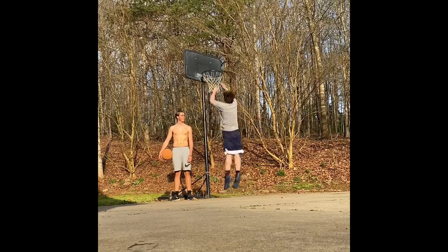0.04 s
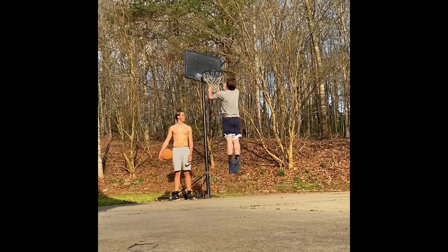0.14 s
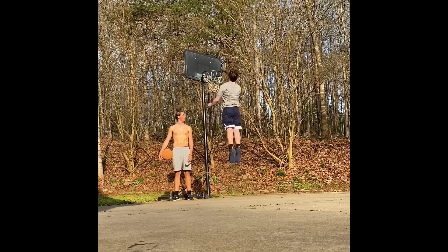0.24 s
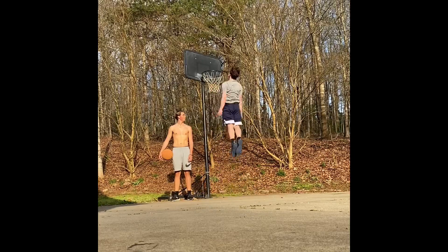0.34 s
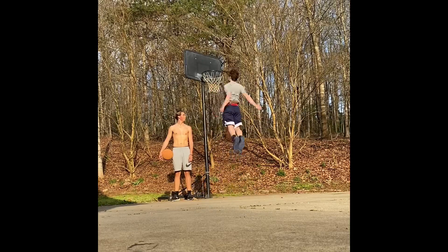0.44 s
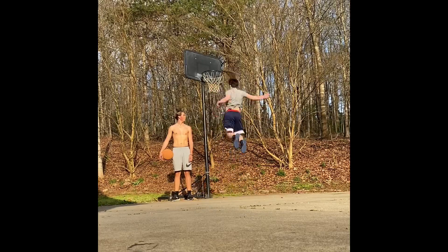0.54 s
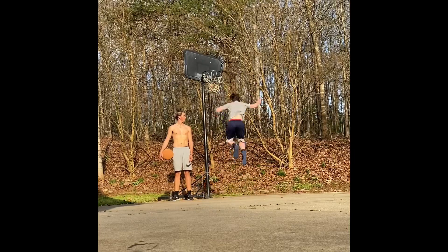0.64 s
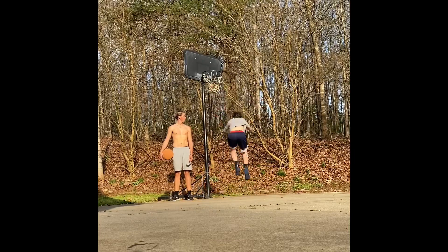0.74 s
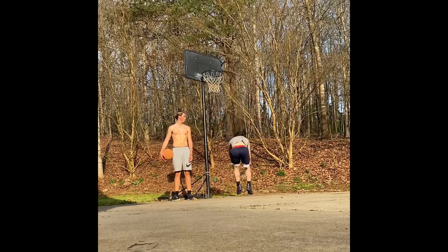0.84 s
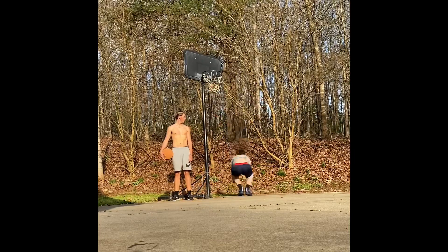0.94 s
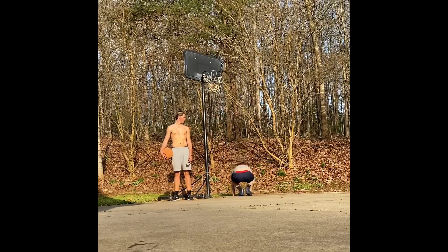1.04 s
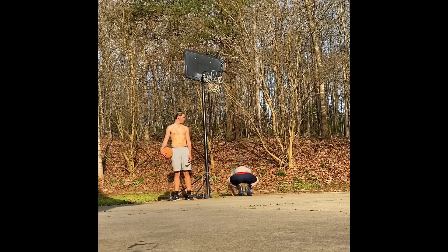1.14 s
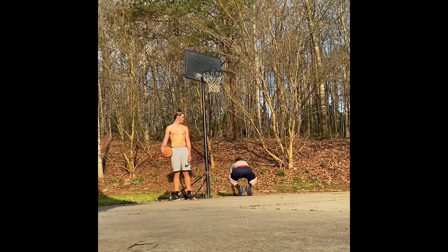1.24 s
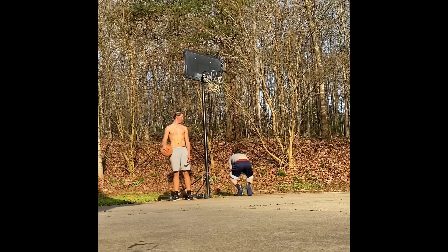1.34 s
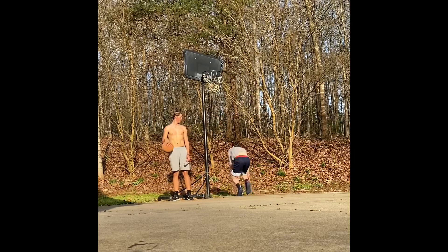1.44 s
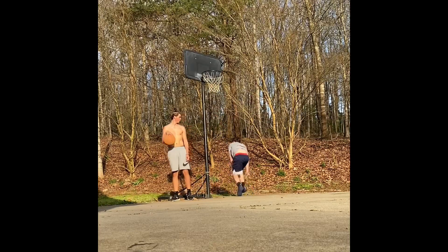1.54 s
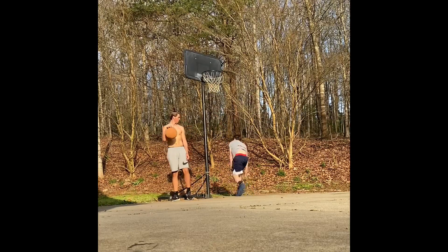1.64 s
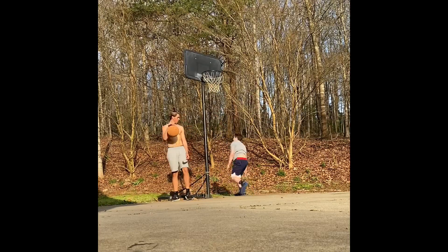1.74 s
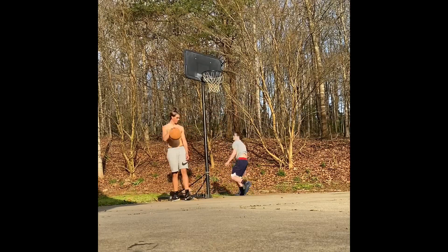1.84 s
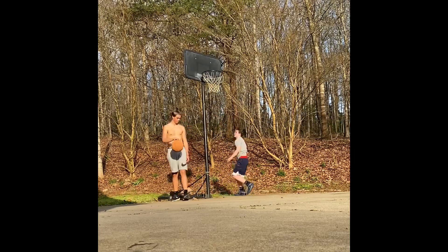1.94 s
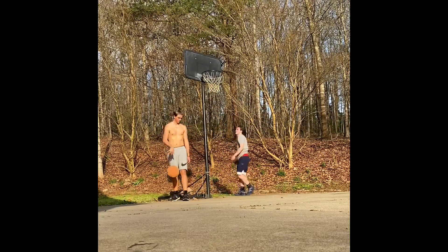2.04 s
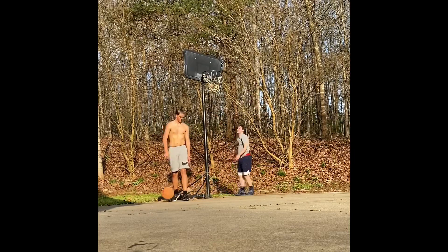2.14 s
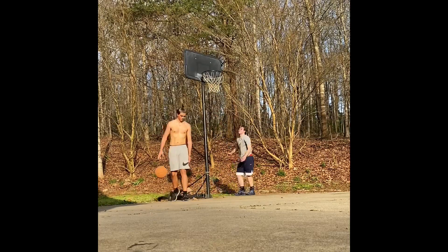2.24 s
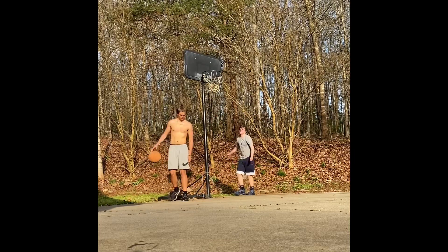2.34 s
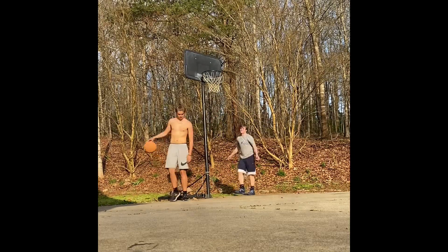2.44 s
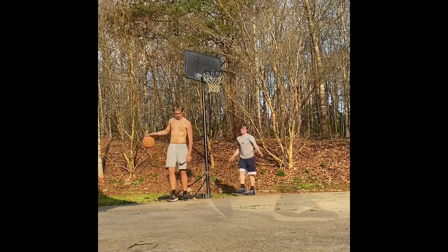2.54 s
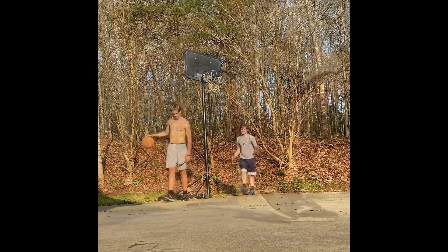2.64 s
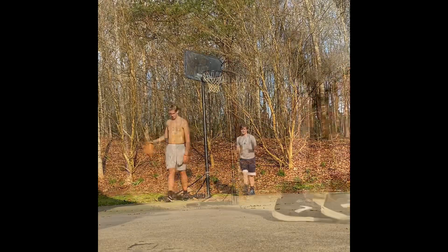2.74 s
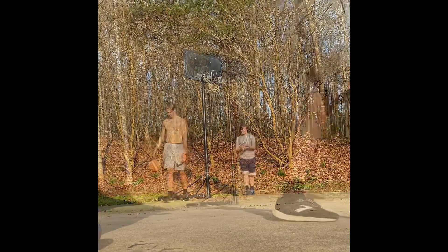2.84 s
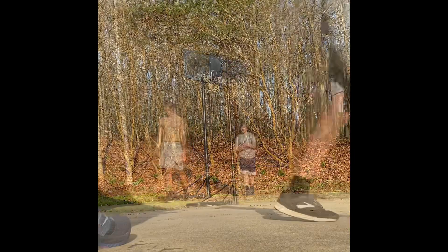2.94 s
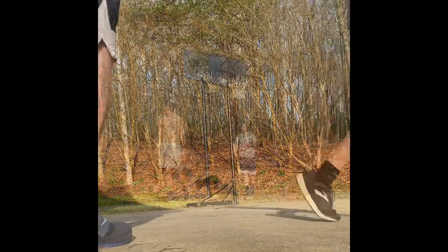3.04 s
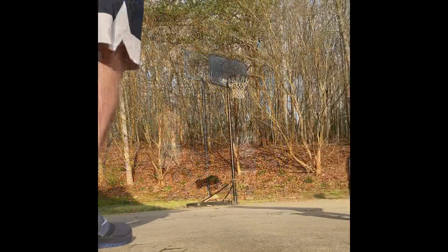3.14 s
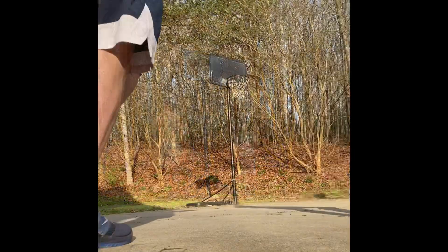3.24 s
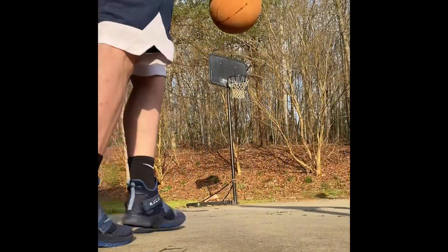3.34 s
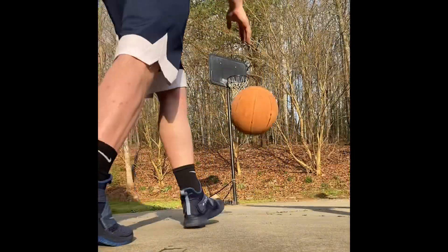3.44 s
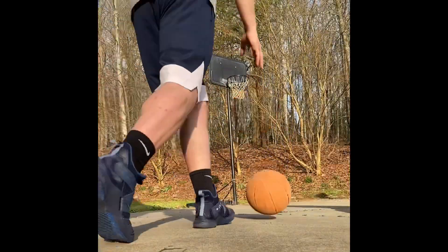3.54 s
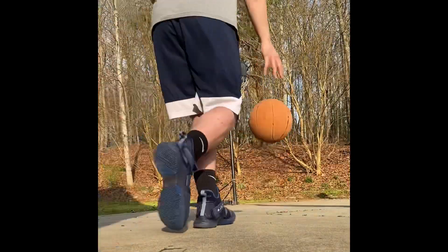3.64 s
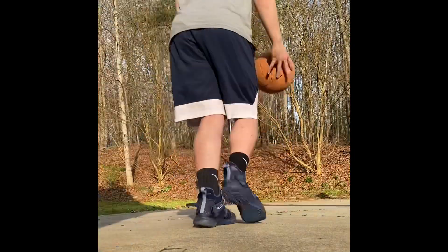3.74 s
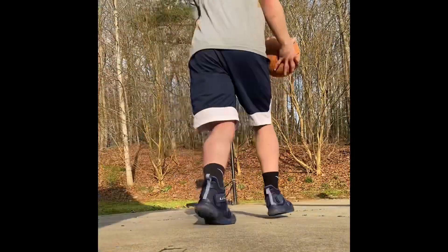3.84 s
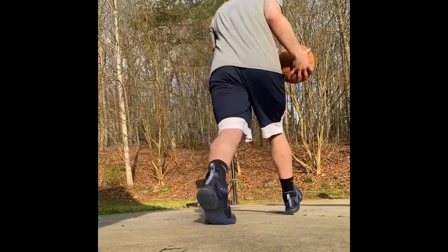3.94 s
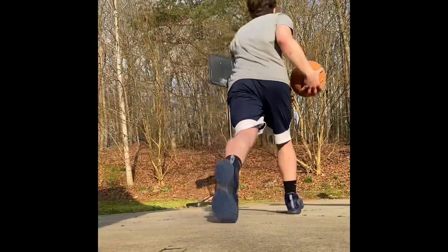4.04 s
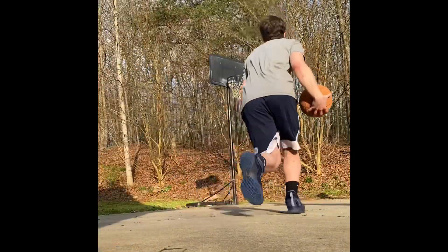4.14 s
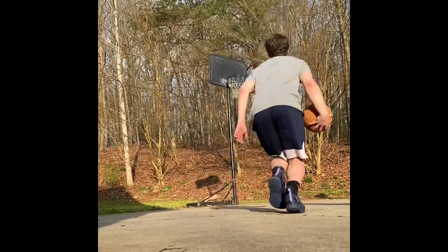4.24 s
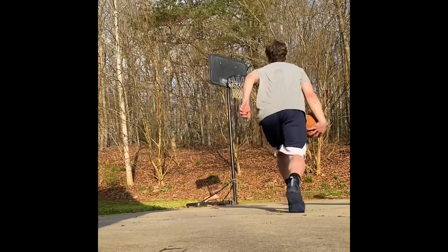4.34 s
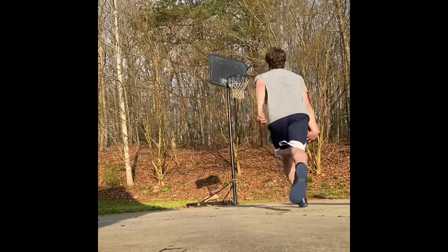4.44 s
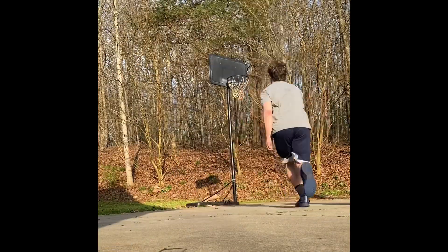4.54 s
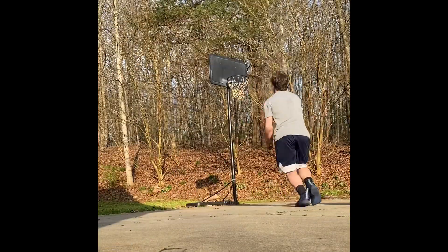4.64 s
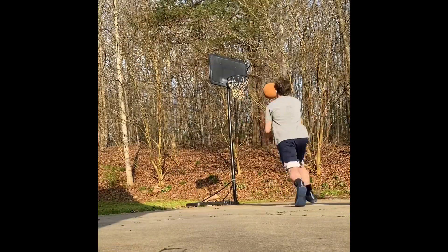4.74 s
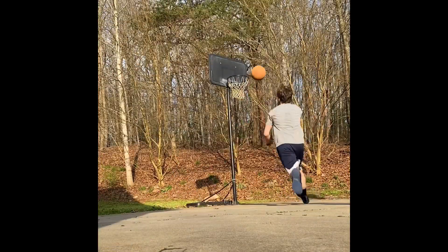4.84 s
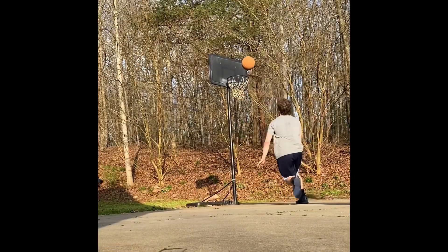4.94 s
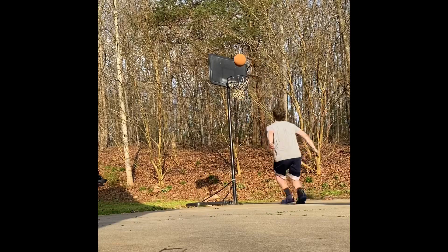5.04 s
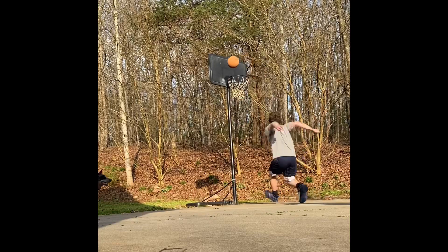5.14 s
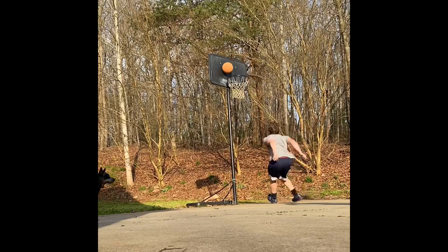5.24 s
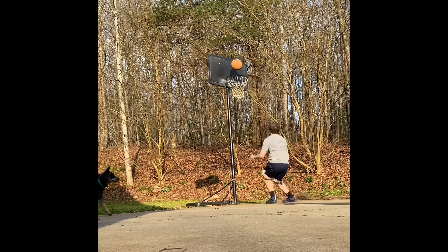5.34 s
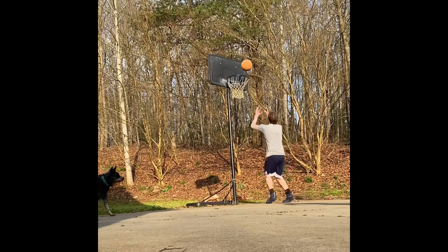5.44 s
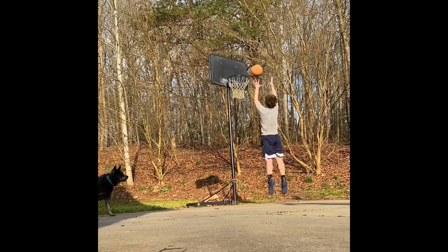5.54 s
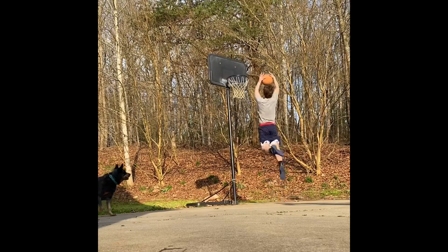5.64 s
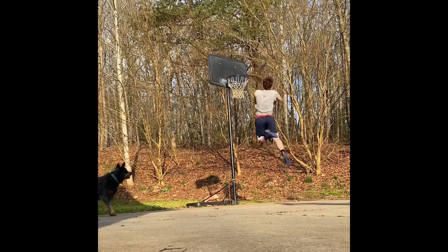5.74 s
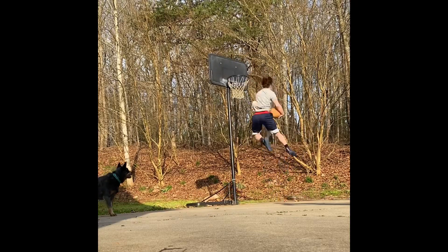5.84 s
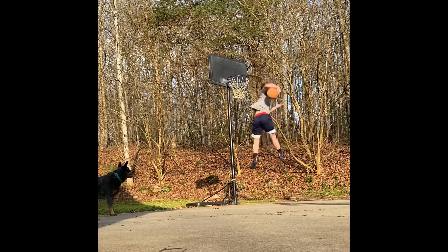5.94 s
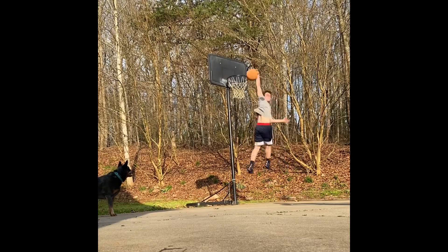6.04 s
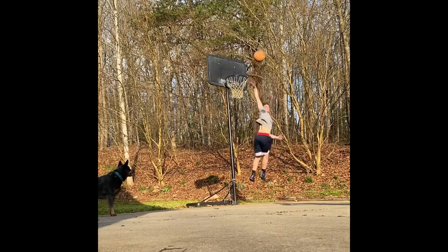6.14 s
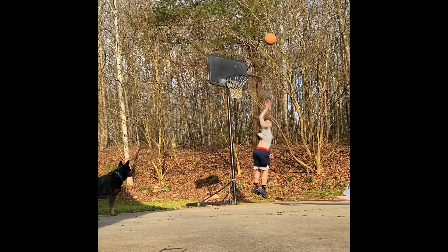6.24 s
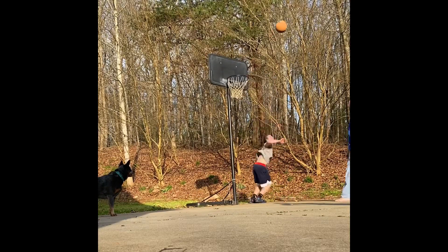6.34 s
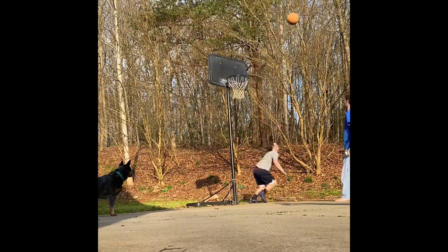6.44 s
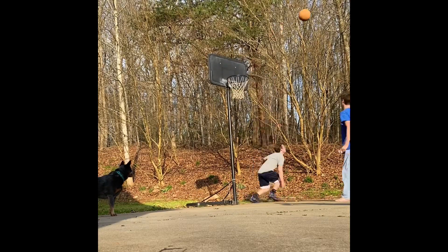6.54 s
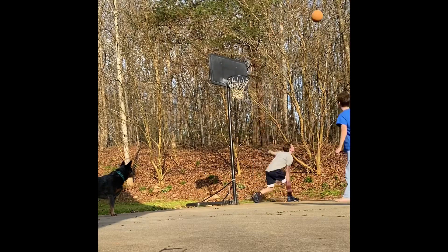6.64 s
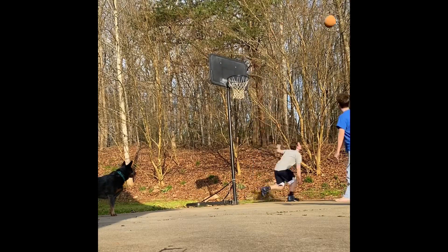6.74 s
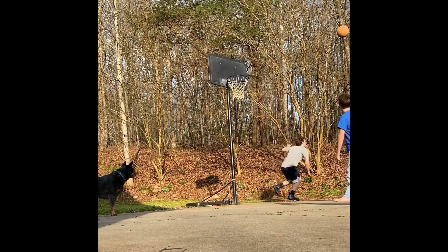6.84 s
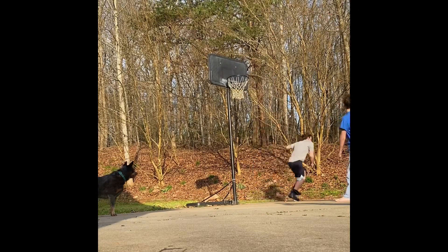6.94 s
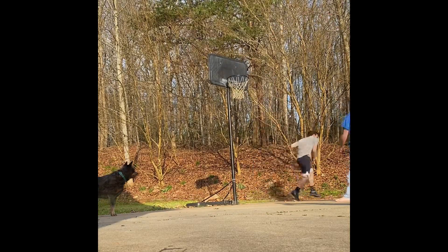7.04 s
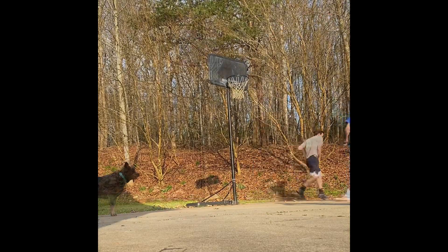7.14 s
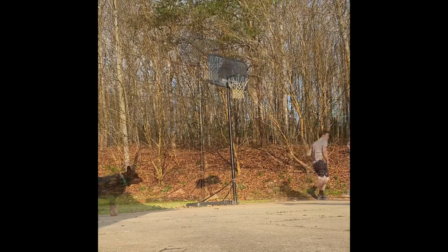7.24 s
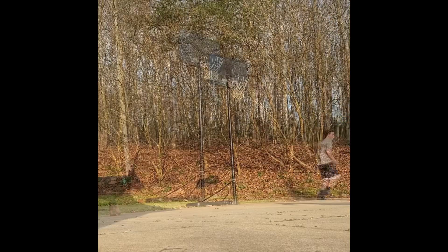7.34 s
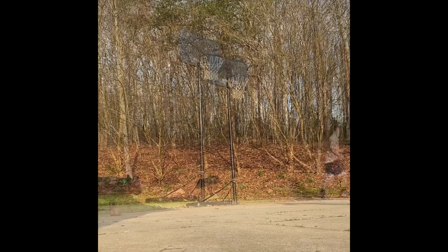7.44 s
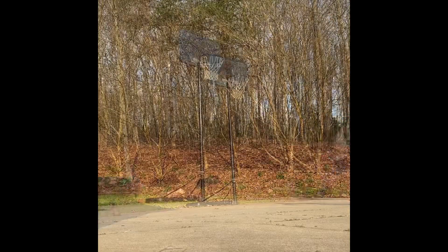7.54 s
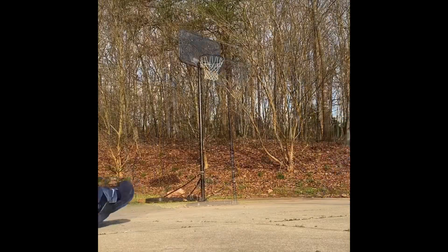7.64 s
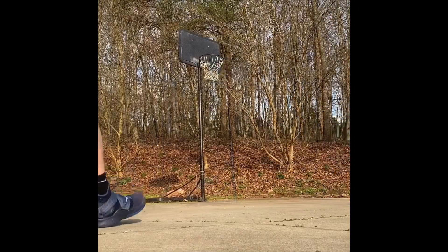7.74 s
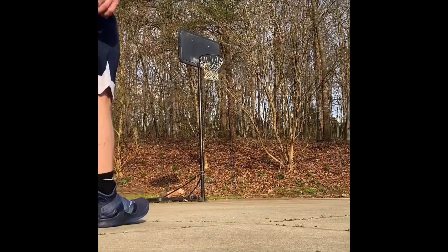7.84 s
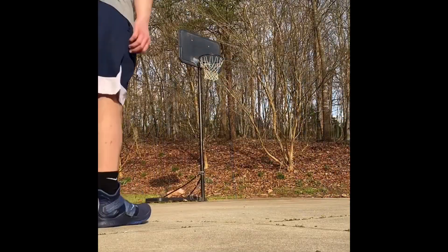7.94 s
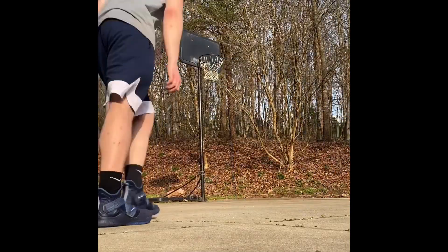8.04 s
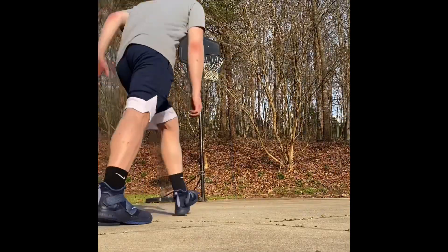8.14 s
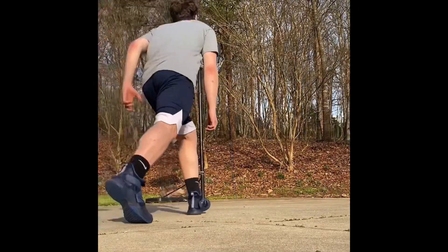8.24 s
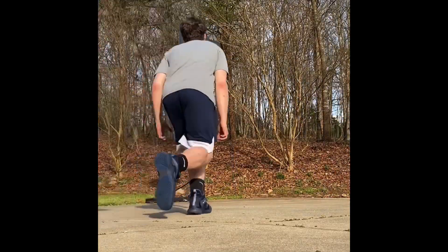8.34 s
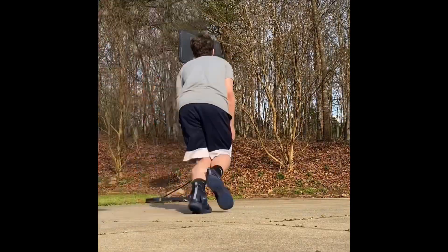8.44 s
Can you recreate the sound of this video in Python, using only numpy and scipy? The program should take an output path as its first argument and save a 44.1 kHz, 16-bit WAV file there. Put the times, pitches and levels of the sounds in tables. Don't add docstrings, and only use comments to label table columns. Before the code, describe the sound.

Outdoor driveway basketball: sharp ball bounces with woody echo, gritty footsteps, a loose hoop clattering, faint bird whistles and a distant machine hum.

```python
import sys
import numpy as np
from scipy import signal
from scipy.fft import rfft, irfft, next_fast_len
from scipy.io import wavfile

SR = 44100
rng = np.random.default_rng(int(sys.argv[2]) if len(sys.argv) > 2 else 0)


def invert_db(level):
    return 10 ** (np.asarray(level, dtype=float) / 20)


def to_wav(sig):
    pcm = np.clip(np.atleast_2d(sig), -1, 1) * 32767
    pcm = np.round(pcm).astype(np.int16)
    wavfile.write(sys.argv[1], SR, pcm.T)


N = 373959
SIZE = next_fast_len(N + SR)
HZ = np.arange(SIZE // 2 + 1) * SR / SIZE + 1e-3


def rms_one(x):
    return x / np.sqrt(np.mean(x ** 2) + 1e-20)


def at_hz(points, hz):
    f, level = np.array(points)[:, 0], np.array(points)[:, 1]
    return np.interp(np.log(hz), np.log(f), level)


def shape(x, response):
    return irfft(rfft(x, SIZE) * response, SIZE)[..., :N]


def coloured(x, spectrum):
    return rms_one(shape(x, invert_db(at_hz(spectrum, HZ))))


def noise(spectrum):
    return coloured(rng.standard_normal(N), spectrum)


def filtered(x, order, hz, kind="low"):
    return signal.sosfilt(signal.butter(order, hz, kind, fs=SR, output="sos"), x)


def drift(rate):
    control_hz = 60
    steps = rng.standard_normal(int(N / SR * control_hz) + 2)
    lowpass = signal.butter(1, min(rate, 29), fs=control_hz, output="sos")
    slow = rms_one(signal.sosfiltfilt(lowpass, steps))
    return np.interp(np.arange(N) / SR * control_hz, np.arange(len(slow)), slow)


def ring(clicks, hz, t60):
    r, w = invert_db(-60 / (t60 * SR)), 2 * np.pi * hz / SR
    return signal.lfilter([0, np.sin(w)], [1, -2 * r * np.cos(w), r * r], clicks + 1e-18)


def strokes(times, level_db, rise, hold, t60):
    out, t = np.zeros(N + SR), np.arange(SR // 2) / SR
    for s, db, up, flat, down in np.broadcast(times, level_db, rise, hold, t60):
        fade = invert_db(db - 60 * np.maximum(t - flat, 0) / max(down, .002))
        out[round(s * SR):][:len(t)] += np.minimum(t / max(up, 1e-4), 1) * fade
    return out[:N]


def swells(base_db, tops, top_db, up_db_per_s, down_db_per_s):
    t, power = np.arange(0, N + 200, 200) / SR, 0
    for s, db, down in np.broadcast(tops, top_db, down_db_per_s):
        fall_db = np.maximum(up_db_per_s * (s - t), down * (t - s))
        power = power + invert_db(db - fall_db) ** 2
    return np.sqrt(invert_db(base_db) ** 2 + np.interp(np.arange(N) / SR, t, power))


def grains(per_s, spread_db):
    sizes = invert_db(spread_db * np.minimum(rng.exponential(1, N), 4)) * rng.choice([-1, 1], N)
    return rms_one(sizes * (rng.random(N) < per_s / SR))


# (t/s of the top, level/dB rms, sag/dB per s)
HUM_SURGES = [(.05, -38, 5), (1.2, -56, 20), (2.4, -40.5, 30), (3.1, -44, 50), (3.75, -38.5, 11.5),
              (6.1, -45.5, 21.5), (6.75, -39.5, 23)]
# (multiple of the fundamental, level/dB)
HUM_OVERTONES = [(2, -24), (3, -34.5)]
# (t/s, level/dB about its mean)
BREEZE = [(0, 11.5), (.55, 6), (1.7, 2), (3.4, 0.5), (4, 2.5), (4.5, 9.5), (5.1, 1.5), (6.8, 7), (7.4, -1),
          (7.8, -6.5), (8.48, 2.5)]
# (base level/dB, share of the breeze's swing, sag of the wash/dB per s)
CALM = [
    (-51, 0.11, 34.5),
    (-55, 0.33, 38),
    (-67.5, 1.21, 44.5),
]
# (t/s of the blow, rumble level/dB, air level/dB, hiss level/dB)
WOODS_WASH = [(.9, -38, -50, -63), (2.15, -35.5, -45, -54.5), (3.53, -57, -39, -54.5),
              (5.27, -39, -39, -48.5), (6.1, -60, -38, -48), (7.46, -56.5, -55.5, -64)]
# (f/Hz, level/dB per Hz)
RUMBLE_SPECTRUM = [(20, -24.5), (35, 11), (55, 19), (90, 19), (140, 17), (220, -59.5)]
AIR_MID = [(82, -15.5), (140, -3.5), (247, -9.5), (436, -16), (735, -20.5), (1130, -20.5), (2000, -30),
           (2900, -64)]
HISS_MID = [(1060, -20), (1800, 0), (4500, 0), (6200, -7.5), (8300, -25.5), (12000, -27.5), (14100, -16.5),
            (16400, -47.5)]
AIR_SIDE = [(24, -38), (40, 0.5), (76, -14), (235, -7), (444, -5.5), (1020, -5), (2000, -21), (2900, -53.5)]
HISS_SIDE = [(1120, -37), (1900, -4.5), (2960, 5.5), (4020, -4), (5610, -5.5), (10700, -11), (14500, -21),
             (16400, -40.5)]


def background():
    hum_hz, idle_db, surge_db_per_s = 110.6, -67, 32
    top, top_db, sag = np.transpose(HUM_SURGES)
    phase = 2 * np.pi * np.cumsum(hum_hz + 0.87 * drift(5.1)) / SR
    hum = np.sin(phase) + sum(invert_db(db) * np.sin(k * phase) for k, db in HUM_OVERTONES)
    surge = swells(idle_db, top, top_db, surge_db_per_s, sag)
    hum = np.sqrt(2) * surge * invert_db(0.26 * drift(18)) * hum

    late_s, wash_db_per_s = 0.088, 96
    breeze_s, breeze_level = np.transpose(BREEZE)
    breeze_db = np.interp(np.arange(N) / SR, breeze_s, breeze_level)
    s, *wash_db = np.transpose(WOODS_WASH)
    rumble, air, hiss = [swells(db + share * breeze_db, s + late_s, late_db, wash_db_per_s, down)
                         for (db, share, down), late_db in zip(CALM, wash_db)]
    air = air * invert_db(2.5 * drift(21))
    hiss = hiss * invert_db(drift(14))
    mid = hum + rumble * noise(RUMBLE_SPECTRUM) + air * noise(AIR_MID) + hiss * noise(HISS_MID)
    side = invert_db(-6.5) * air * noise(AIR_SIDE) + hiss * noise(HISS_SIDE)
    return np.array([mid + side, mid - side])


# (t/s, fine grit level/dB, coarse grit level/dB, rubber level/dB)
BRUSHES = [(.005, -33, -62, -42), (.4044, -45, -65, -46), (0.777, -39, -64, -68), (3.01, -39.5, -48, -39),
           (3.74, -52, -57.5, -40.5), (4.4495, -42, -45.5, -31), (4.54, -34, -46.5, -46),
           (4.7596, -24.5, -33.5, -59), (4.785, -45, -45.5, -39), (4.867, -32, -49.5, -41),
           (5.1075, -34, -50.5, -36.5), (5.237, -25, -64, -63), (8.383, -45, -58, -56.5)]
# (t/s, fine grit level/dB, coarse grit level/dB, rubber level/dB, hold/s)
DRAGS = [(2.377, -26.5, -55, -37, 0.043), (2.925, -52, -57, -50, 0.05), (3.4483, -41, -49, -40, 0.029),
         (3.478, -60, -47, -42, 0.04), (3.514, -46, -55, -32, 0.021), (3.61, -45, -70, -47, 0.065),
         (3.67, -55, -53.5, -48.5, 0.041), (3.773, -52.5, -54, -44.5, 0.022),
         (7.447, -48, -59, -56, 0.0081), (2.135, -39, -47, -52, .01), (3.79, -55, -60, -44.5, 0.033),
         (3.934, -34, -43, -38.5, 0.039), (3.985, -28.5, -44, -33.5, 0.04), (4.231, -32, -52, -55, 0.037),
         (4.274, -29, -50, -67, 0.052), (4.338, -38, -46, -41.5, 0.04), (4.662, -40, -53, -53, 0.079),
         (5.169, -21, -35.5, -36, 0.034), (5.208, -12, -57, -62, 0.027), (7.124, -37.5, -79, -53.5, 0.0495),
         (7.844, -63, -66.5, -57, 0.061), (7.912, -44.5, -56, -55.5, 0.042), (8.048, -39, -56, -58, 0.035),
         (8.07, -39, -56.5, -43.5, 0.055), (8.3, -47, -60, -66, 0.063), (8.154, -60, -70.5, -51.5, .015),
         (8.401, -42, -58, -43.5, 0.037)]
# (f/Hz, level/dB per Hz)
FINE_GRIT = [(2200, -20), (3300, -4), (4400, 0), (6800, -3), (10000, -8), (13000, -27), (16000, -40)]
COARSE_GRIT = [(900, -15.5), (1500, 3.5), (2100, 1.5), (3200, 0.5), (4500, -11.5)]
RUBBER = [(150, -25), (400, -4.5), (800, 1), (1400, -5), (2400, -18.5)]


def scuffs():
    brush_hold_s, brush_t60_s, drag_fade_holds = 0.014, 0.11, 3
    rows = [(*row, drag_fade_holds * row[-1]) for row in DRAGS]
    rows += [(*row, brush_hold_s, brush_t60_s) for row in BRUSHES]
    s, fine_db, coarse_db, rubber_db, hold, t60 = np.transpose(rows)
    crackle = grains(5500, spread_db=3.6)
    slip = invert_db(2.2 * drift(34))
    layers = ((coloured(crackle, FINE_GRIT), fine_db - 19.5),
              (coloured(crackle, COARSE_GRIT), coarse_db),
              (noise(RUBBER), rubber_db - 8.0))
    return slip * sum(layer * strokes(s, db, 0.45 * hold, hold, t60) for layer, db in layers)


# (t/s, level/dB)
TICKS = [(.0736, -34.5), (0.119, -44.5), (.57, -51), (.779, -47), (.172, -47), (1.21, -57), (2.144, -57),
         (2.3875, -43), (2.72, -52), (2.8635, -41), (2.882, -45), (2.936, -51), (2.951, -49), (2.956, -46),
         (2.986, -46), (3.075, -49), (3.0045, -40), (3.4788, -39.5), (3.976, -35.5), (4.2897, -44),
         (4.466, -39), (4.7684, -45), (4.8758, -44), (5.176, -32), (5.269, -23), (5.4699, -30),
         (5.8194, -38.5), (6.0841, -45), (6.101, -28.5), (6.6734, -39), (7.473, -36.5), (7.9064, -54.5),
         (7.965, -50), (8.1265, -46.5), (8.338, -48)]


def ticks():
    blow_tick_db = -32
    skid_s, skid_db, skid_hold_s = 5.176, -30, .076
    s, db = np.transpose(TICKS + [(s, slap_db + blow_tick_db) for s, slap_db, *_ in BLOWS])
    bright = filtered(rng.standard_normal(N), 2, 3000, "high")
    fizz = filtered(bright, 8, 12000, "high") * invert_db(2.5 * drift(28))
    bursts = bright * strokes(s, db - 5.5, rise=0.0003, hold=0.003, t60=0.006)
    return bursts + fizz * strokes(skid_s, skid_db, 0.0022, skid_hold_s, 0.021)


# (t/s, level/dB, f/Hz, t60/s)
CLACKS = [(2.1512, -11.5, 4900, .003), (2.1645, -21, 4330, 0.011), (2.168, -25.5, 2400, .006),
          (3.273, -38, 2000, 0.0085), (3.5335, -13.5, 3000, 0.0053), (3.75, -37, 704, .02),
          (3.803, -32, 420, 0.05), (3.825, -41, 890, 0.018), (4.2445, -18, 3340, 0.0036),
          (4.3125, -22, 3700, 0.004), (4.767, -15.5, 3820, 0.007), (4.7914, -24.5, 3300, 0.0091),
          (5.1163, -32.5, 2160, 0.04), (5.223, -23.5, 4500, 0.028), (5.235, -22, 6000, 0.013),
          (5.2692, -10.5, 3600, 0.004), (6.053, -40, 3380, 0.14), (6.1005, -23, 3540, 0.025),
          (6.1223, -17.5, 1590, 0.0085), (6.3042, -28, 1500, 0.0044), (6.314, -31, 1800, 0.027),
          (6.335, -19.5, 2090, 0.0043), (6.3647, -15.5, 2140, 0.0041), (6.5822, -36, 3730, 0.038),
          (6.674, -21, 2152, 0.014), (6.6762, -23, 2000, 0.023), (7.0572, -35.5, 2080, 0.0059),
          (8.012, -40, 2054, 0.0054),
          (.882, -11, 1780, 0.012), (0.8865, -16.5, 2370, 0.0056), (.888, -28, 1090, 0.0065),
          (.9035, -18, 5560, .006), (.907, -16.5, 2260, .008), (.914, -27, 4210, .02),
          (.925, -32.5, 3260, 0.047), (.948, -33, 4840, .01), (1.0546, -32.5, 5800, 0.0067),
          (3.453, -38.5, 4570, .005), (3.551, -30, 4700, 0.01), (3.9551, -27, 3040, 0.0043),
          (4.035, -33, 5000, 0.0075), (4.217, -43, 1750, 0.011), (4.2317, -29.5, 2450, .003),
          (4.2901, -32.5, 2850, 0.0048), (4.3073, -28.5, 3000, 0.0061), (4.327, -33, 3300, 0.0044),
          (4.447, -39, 3500, .004), (4.458, -38, 825, 0.04), (4.468, -38, 1100, 0.025),
          (4.7024, -43.5, 2200, 0.0045), (4.87, -36.5, 4140, 0.0058), (7.169, -41, 1510, .006),
          (7.8517, -48, 1520, .004), (2.912, -38, 800, .008), (7.9074, -42, 5730, 0.0026),
          (7.926, -44, 1610, .004), (7.9325, -46, 2600, 0.0037), (.165, -38, 600, .01),
          (7.965, -43, 3430, .003), (4.777, -25, 3000, .004), (6.2953, -26, 1500, .004),
          (8.065, -39, 4900, 0.0089), (8.0746, -37.5, 4300, 0.013), (8.08, -35, 3900, 0.012),
          (8.087, -40, 3400, .01), (6.277, -29, 1040, .006), (8.11, -40, 1800, .006),
          (2.936, -41, 3280, .003), (8.315, -47, 5400, 0.0035), (2.9555, -36, 1830, .004),
          (8.3385, -38, 1660, .003), (8.3386, -46, 5400, .003), (8.35, -38, 5600, 0.0036),
          (8.389, -42, 3820, .004), (8.4184, -40, 1560, .01), (.415, -37, 900, .008),
          (8.455, -44, 1200, .01)]


def clacks():
    crack_db = 3
    out, t = np.zeros(N + SR), np.arange(SR // 10)
    hits = CLACKS
    for (s, db, hz, t60), (gap, share) in zip(hits, rng.random((len(hits), 2))):
        second = int((.0012 + .002 * gap) * SR)
        touch = 1. * (t == 0) + share * (t == second)
        crack = invert_db(crack_db) * np.diff(touch, prepend=0)
        out[round(s * SR):][:len(t)] += invert_db(db) * (ring(touch, hz, t60) + crack)
    return filtered(out[:N], 2, 7000)


# (t/s, slap level/dB, thump level/dB, body level/dB, echo level/dB)
BLOWS = [(0.882, -25, -25.5, -14.5, 3), (0.9027, -9, -32.5, -30, -10.5), (1.0553, -24.5, -37, -52, -37),
         (1.0719, -22, -39, -30, -19), (1.6691, -49, -61, -39.5, 5.5), (2.151, -4.5, -17, -17.5, -11.5),
         (2.4, -26.5, -57, -34, -45), (2.9962, -16, -27.5, -29, -11), (3.5336, 2.5, -10.5, -14.5, -19),
         (4.6301, -23, -59, -42.5, -19.5), (5.0261, -26, -42, -31.5, -5.5), (5.2688, -30, -21, -17, -10.5),
         (7.4618, -11, -24.5, -25, -15)]
# (f/Hz, level/dB, t60/s)
BALL_MODES = [(109.4, 5.5, 0.062), (75, -17.5, 0.062), (256, -3, 0.04), (198, -11, 0.032), (450, -8, 0.02),
              (690, -11.5, 0.033), (838, -5, 0.024), (1150, -2.5, 0.016), (1660, -11, 0.027)]
# (f/Hz, level/dB, t60/s)
SNAP_MODES = [(2010, 3, 0.0036), (1410, -20, 0.0051), (3370, -22.5, 0.0023), (4640, -25.5, 0.023)]
# (f/Hz, level/dB per Hz)
SLAP_SPECTRUM = [(300, 1), (1000, 3.5), (2100, -10.5), (3000, -11), (4500, -11), (7000, -21.5),
                 (10000, -20.5), (16000, -34)]
ECHO_SPECTRUM = [(60, 5), (120, -1.5), (300, -6.5), (1500, -17.5), (2500, -20.5), (4500, -21.5),
                 (7000, -31.5), (16000, -51)]


def blows():
    squash_s = 0.0017
    s, slap_db, thump_db, body_db, echo_db = np.transpose(BLOWS)
    out = noise(SLAP_SPECTRUM) * strokes(s, slap_db - 9.5, rise=0.0001, hold=0.0013, t60=0.029)
    parts = ((BALL_MODES[:2], thump_db + 4.0, squash_s),
             (BALL_MODES[2:], body_db + 1.0, 0),
             (SNAP_MODES, slap_db - 5.0, 0))
    for modes, part_db, wait in parts:
        moments = np.round((s + wait) * SR).astype(int)
        for hz, db, t60 in modes:
            clicks = np.zeros(N)
            clicks[moments] = invert_db(part_db + db + rng.normal(0, 1, len(s)))
            if hz > 600:
                clicks -= .6 * np.roll(clicks, round(rng.uniform(.002, .005) * SR))
            out = out - ring(clicks, hz, t60)

    wall_s, wall_db = 0.013, -9.5
    bright = filtered(out, 2, [600, 2600], "band")
    for lag, share in ((0, 0.94), (.006, 0.5)):
        out = out + invert_db(wall_db) * share * np.roll(bright, round((wall_s + lag) * SR))
    sent = np.zeros(N)
    sent[np.round(s * SR).astype(int)] = invert_db(slap_db + echo_db + 40.5)
    return out, shape(sent, invert_db(at_hz(ECHO_SPECTRUM, HZ)))


# (t/s, f/Hz, length/s, level/dB)
LEVEL_WHISTLES = [(2.42, 2850, .21, -71), (6.87, 4150, .13, -72), (7.18, 4130, .15, -69),
                  (7.55, 3450, .09, -71)]
# (t/s of the end, level/dB)
FALLING_WHISTLES = [(7.762, -68), (8.037, -66), (8.32, -67)]
# (t/s relative to its end, f/Hz, level/dB)
FALL_COURSE = [(-.12, 4050, -12), (-.085, 3700, -4), (-.026, 3250, -1), (0, 2250, 2)]


def birds():
    rise_s, start_db, sag_db = .04, -9, -4
    out, flutter, waver = np.zeros(N), invert_db(1.8 * drift(25)), 1 + 0.003 * drift(22.5)
    calls = [[(s, hz, db + start_db), (s + rise_s, hz, db), (s + length, hz, db + sag_db)]
             for s, hz, length, db in LEVEL_WHISTLES]
    calls += [np.add(FALL_COURSE, (end, 0, db)) for end, db in FALLING_WHISTLES]
    for call in calls:
        s, hz, db = np.transpose(call)
        t = np.arange(round(s[0] * SR), round(s[-1] * SR))
        pitch = np.interp(t / SR, s, hz) * waver[t]
        out[t] += invert_db(np.interp(t / SR, s, db)) * np.sin(2 * np.pi * np.cumsum(pitch) / SR)
    return out * flutter


# (t/s, level/dB, f/Hz, t60/s)
PINGS = [(5.29, -36, 4520, 0.084), (5.3, -39, 6000, .15), (5.474, -35.5, 5561, 0.055),
         (5.49, -35.5, 3600, 0.058), (5.681, -32, 1670, 0.053), (5.683, -35.5, 3820, 0.056),
         (5.12, -31, 236, 0.061), (5.481, -32.5, 1000, 0.036), (6.318, -27.5, 330, 0.072),
         (6.338, -31, 450, .06), (5.8205, -29.5, 3440, 0.038), (6.056, -40, 3850, 0.085),
         (6.096, -28, 5561, 0.17), (6.112, -28, 3981, .05), (6.136, -35, 4000, 0.053),
         (6.102, -17.5, 426, 0.089), (6.122, -18, 475.2, 0.06), (6.075, -40, 756, 0.03),
         (6.295, -21.5, 261, 0.11), (6.315, -30, 625, 0.034), (6.366, -33.5, 3600, 0.026),
         (6.491, -45, 5500, 0.096), (6.5, -45, 4180, .06), (6.446, -40, 1600, 0.052),
         (6.465, -36, 530, 0.054), (6.5822, -40.5, 5561, 0.052), (6.584, -40, 3300, 0.04),
         (6.582, -38, 4000, .04), (6.581, -44.5, 2440, .04), (6.669, -33, 5700, 0.022),
         (6.669, -29, 6650, 0.023), (6.695, -41, 2030, 0.05), (6.806, -30, 561, 0.15),
         (6.826, -36.5, 556, .16), (6.815, -43, 1120, .06), (6.824, -37, 1700, .04),
         (6.815, -42, 4400, 0.04), (6.82, -44, 3400, .07), (6.895, -55, 3500, .1)]


def pings():
    touches, chatter_share = 7, .6
    twin_apart, twin_db = 0.0082, -9
    out, size = np.zeros(N), SR // 5
    for (s, db, hz, t60), (when, share) in zip(PINGS, rng.random((len(PINGS), 2, touches))):
        touch = np.zeros(size)
        moments = (when * chatter_share * t60 * SR).astype(int) % size
        touch[moments] = (2 * share - 1) * (1 - when)
        touch[0] = 1.1
        twin_hz = hz * (1 + twin_apart * (1 + share[0]))
        twin = invert_db(twin_db) * ring(touch, twin_hz, t60 / 2)
        out[round(s * SR):][:size] += invert_db(db - 2.5) * (ring(touch, hz, 0.62 * t60) + twin)
    return filtered(out, 2, 7000)


# (t/s, rim level/dB, board level/dB, base level/dB, rattle t60/s)
KNOCKS = [(5.2676, -17, -28, -23, 0.41), (5.47, -22, -26.5, -49, 0.19), (5.6512, -33.5, -36.5, -55, 0.32),
          (5.68, -29, -37.5, -39, 0.082), (5.8167, -25, -38, -41, 0.2), (6.053, -35.5, -43, -33, 0.26),
          (6.074, -33, -28, -35, 0.28), (6.1, -15.5, -24, -42, 0.12), (6.123, -26, -36, -53, 0.11),
          (6.212, -36.5, -37, -48, 0.056), (6.279, -39, -36.5, -53, 0.035), (6.293, -37, -28, -25, 0.15),
          (6.3156, -39, -50, -41, 0.034), (6.336, -27.5, -42, -27, 0.1), (6.36, -29, -56, -42, 0.045),
          (6.44, -41, -34.5, -29.5, 0.32), (6.4874, -29, -47, -30, 0.076), (6.5797, -40, -44, -43, 0.98),
          (6.6327, -46, -42, -50, 0.054), (6.668, -22, -41.5, -31, 0.042), (6.801, -40, -48, -53, 0.068),
          (6.826, -39, -38, -58, 0.1)]
# (f/Hz, level/dB, t60/s)
BASE_MODES = [(48.7, -18, 0.29), (73, -4.5, 0.21), (93.5, 7, 0.028), (118, -22, 0.26), (178, 0.5, 0.14)]
BOARD_MODES = [(262, -1.5, 0.15), (307, -3.5, 0.1), (350.4, -6.5, 0.26), (409, -7, 0.15),
               (475.5, -2, 0.074), (551, 2, 0.064), (634, 0, 0.037), (758, 3.5, 0.036), (857, -1.5, 0.036),
               (932, -2, 0.03), (1110, 8, 0.0089)]
RIM_MODES = [(1570, -4, .03), (3400, -8, .04), (3560, -8, .05), (4550, -9, .03), (5561, -11, .1),
             (6000, -10, .03)]
# (f/Hz, level/dB per Hz)
CLATTER_SPECTRUM = [(600, -28), (1200, -2), (2000, 5.5), (2800, 3.5), (4500, 1.5), (7000, -1), (11000, -6),
                    (16000, -17)]


def hoop():
    s, rim_db, board_db, base_db, t60 = np.transpose(KNOCKS)
    latest = np.maximum(np.searchsorted(s * SR, np.arange(N), "right") - 1, 0)
    parts = ((BASE_MODES, base_db - 33.0, 300),
             (BOARD_MODES, board_db - 29.5, 450),
             (RIM_MODES, rim_db - 40.5, 900))
    out = 0
    for modes, part_db, per_s in parts:
        chatter = strokes(s, part_db, rise=0.002, hold=0.005, t60=t60)
        joints = [chatter * grains(per_s, spread_db=2.5) for _ in range(3)]
        spot = invert_db(rng.normal(0, 2.6, (len(s), len(modes))))
        for k, (hz, db, decay) in enumerate(modes):
            out = out + invert_db(db) * ring(joints[k % 3] * spot[latest, k], hz, decay)
    clatter = coloured(grains(1800, spread_db=1.0), CLATTER_SPECTRUM)
    return out + clatter * strokes(s, rim_db - 17, rise=0.0013, hold=0.015, t60=0.91 * t60)


# (f/Hz, t60/s)
TREE_DECAY = [(80, 0.52), (400, 0.44), (1100, 0.53), (3000, 0.53), (7000, 0.42), (14000, 0.33)]


def trees(x):
    t, tail = np.arange(SR * 3 // 4) / SR, 0
    white, trunks = rng.standard_normal((2, len(t))), drift(31)[:len(t)]
    for k, low in enumerate(44 * 2. ** np.arange(8.5)):
        band = filtered(white, 2, [low, min(2 * low, 19000)], "band")
        lumps_db = 3 * (.35 * trunks + drift(25)[:len(t)])
        decay_db = 60 * t / at_hz(TREE_DECAY, low * np.sqrt(2))
        tail = tail + (-1) ** k * band * invert_db(lumps_db - decay_db)
    tail = tail * np.clip((t - .006) / 0.002, 0, 1)
    return shape(x, rfft(tail / np.sqrt(np.sum(tail ** 2) / 2), SIZE))


# (f/Hz, phase/rad)
PORT_LEAD = [(0, 0), (340, .1), (780, 1.3), (1800, 0), (3010, 1.2), (3620, .7), (6900, 1.7), (7800, 3.05),
             (11200, 3.25), (16400, 5.7)]


def ports(x, wider):
    lead = wider * np.interp(HZ, *np.transpose(PORT_LEAD)) / 2
    return shape(x, np.exp(1j * lead * [[1], [-1]]))


def scene():
    blow, sent = blows()
    rub, rattle, song = scuffs(), hoop() + pings(), invert_db(4) * birds()
    echo, other = trees(sent + invert_db(-13.5) * rub + invert_db(-9.0) * rattle + song / 2)
    direct = blow + rub + rattle + clacks() + song
    near = ports(direct + echo, wider=0.94) + ports(ticks(), wider=0.47)
    spread = invert_db(-1.5) * filtered(other, 1, 400, "high")
    return near + spread * [[1], [-1]] + background()


def low_pass(x):
    return signal.sosfilt(signal.butter(12, 16800, fs=SR, output="sos"), x)


# (f/Hz, width/Hz, level/dB)
CAVITIES = [(3510, 230, 3), (4500, 390, 4), (5690, 390, 4)]
# (f/Hz, left minus right level/dB)
LEFT_EXCESS = [(60, -.4), (250, -1.6), (1000, -.7), (2000, -1.5), (4000, -.3), (7000, 0)]


def record(dry):
    smear_s, smear_hz = 0.002, 2490
    late = smear_s * np.log(np.maximum(smear_hz / np.maximum(HZ, 320), 1))
    smear = np.exp(-2j * np.pi * np.cumsum(late) * SR / SIZE)
    cavity_db = sum(db / (1 + (2 * (HZ - hz) / width) ** 2) for hz, width, db in CAVITIES)
    lean = invert_db(cavity_db - 2.0 * (HZ > 2600) + at_hz(LEFT_EXCESS, HZ) / 2 * [[1], [-1]])
    cut = filtered(shape(dry, smear * lean), 6, 44, "high")
    cut = cut / (1 + cut ** 8) ** (1 / 8)
    cut = signal.sosfilt(signal.cheby2(10, 50, 16700, fs=SR, output="sos"), cut)
    return low_pass(cut)


dry = scene()
out = record(dry)
to_wav(out)
```